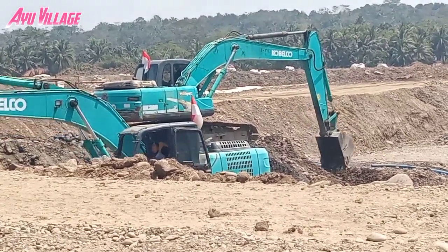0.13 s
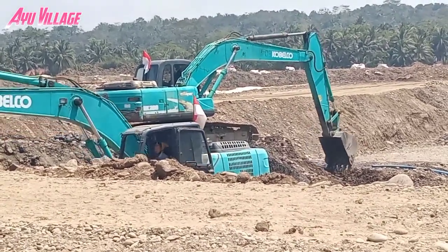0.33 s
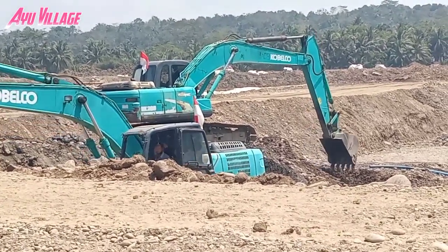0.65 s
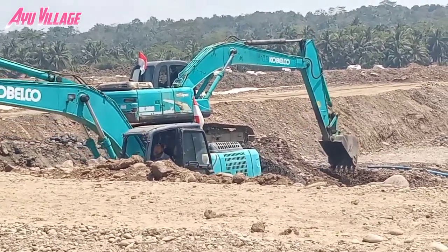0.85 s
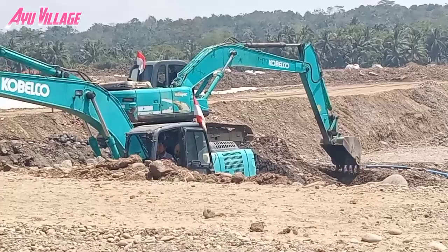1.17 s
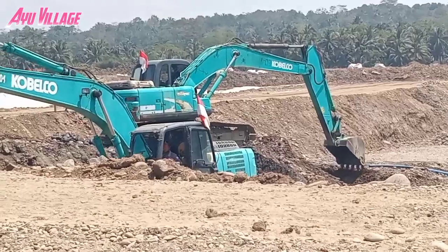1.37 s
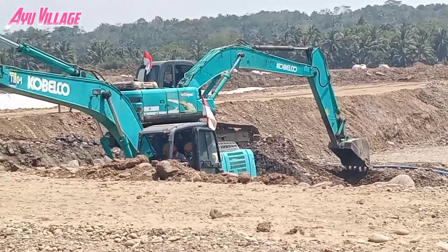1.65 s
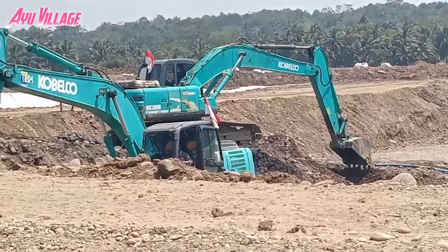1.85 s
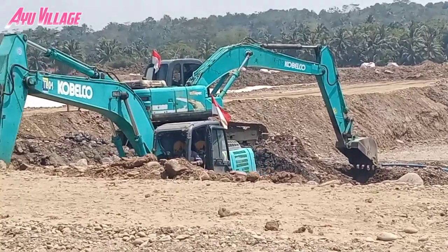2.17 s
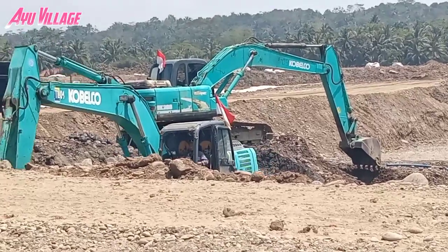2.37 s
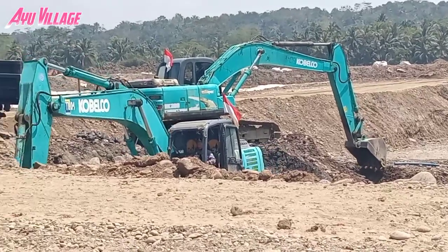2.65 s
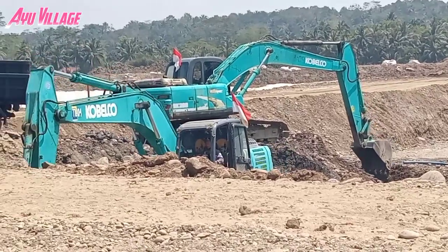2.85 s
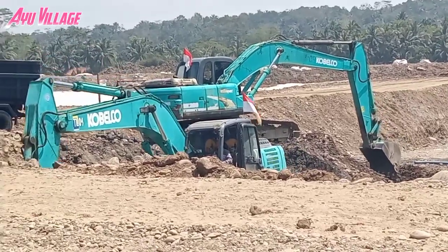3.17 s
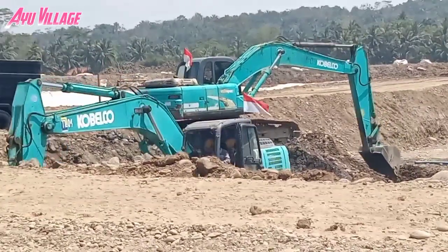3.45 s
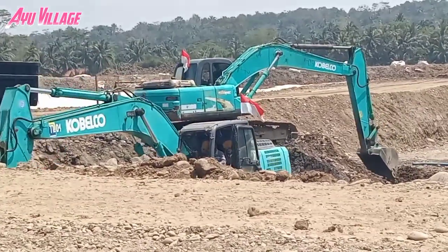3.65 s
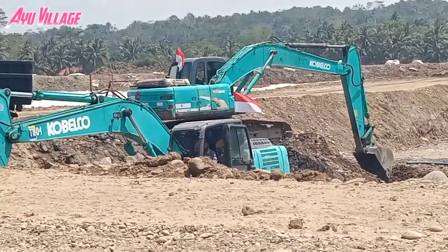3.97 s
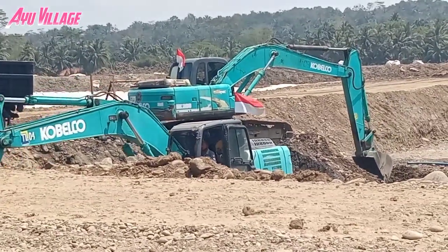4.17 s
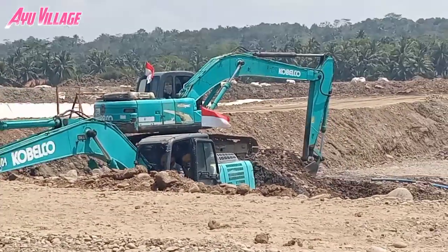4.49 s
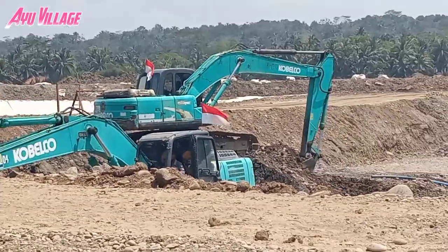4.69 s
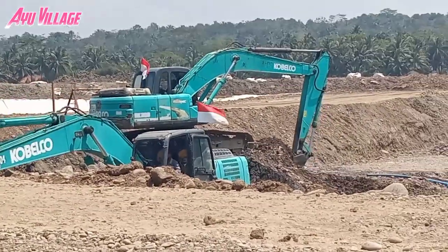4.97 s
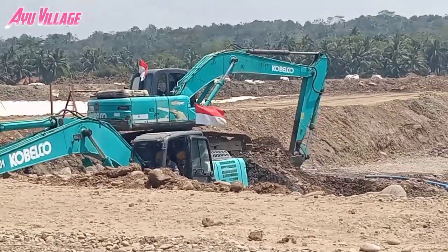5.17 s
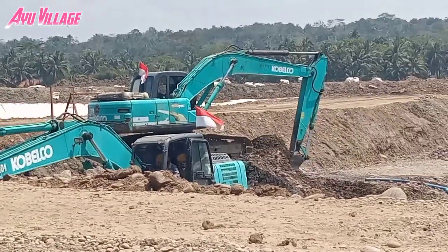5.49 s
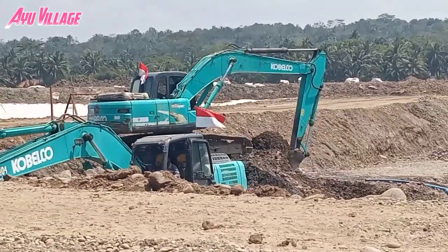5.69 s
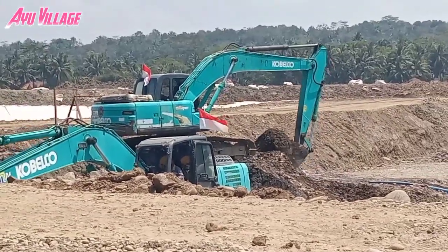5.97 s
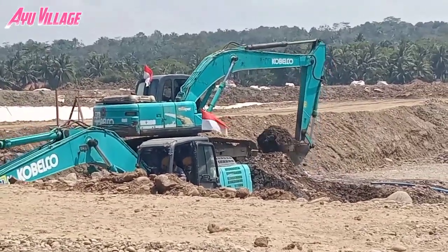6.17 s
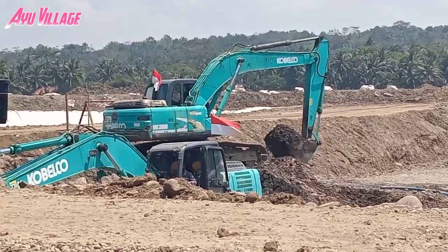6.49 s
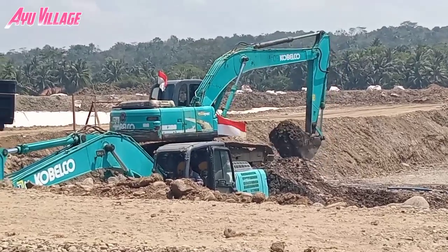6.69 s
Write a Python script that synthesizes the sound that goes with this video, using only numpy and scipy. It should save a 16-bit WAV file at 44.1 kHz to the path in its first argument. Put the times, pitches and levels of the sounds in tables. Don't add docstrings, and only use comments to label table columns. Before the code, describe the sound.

Heavy diggers work stony ground in an open pit, heard from some way off on a simple microphone with limited treble. Low exhaust throb and midrange engine roar run beneath everything. Isolated metallic clanks give way to gritty scraping, dull ground thumps and sharp stone-on-steel bangs. A very brief silent cut follows, then the engines return with a low whistle, sparse clanks and rubble.

```python
import sys
import numpy as np
from scipy import signal
from scipy.fft import rfft, irfft, next_fast_len
from scipy.io import wavfile
from scipy.ndimage import uniform_filter1d, map_coordinates

SR = 44100
rng = np.random.default_rng(int(sys.argv[2]) if len(sys.argv) > 2 else 0)


def master_out(mix):
    frames = np.transpose(np.atleast_2d(mix))
    ceiling = np.clip(frames, -1, 1)
    pcm = np.round(ceiling * 32767).astype(np.int16)
    wavfile.write(sys.argv[1], SR, pcm)


def nominal_scale(level):
    x = np.asarray(level, float) / 20
    return 10 ** x


N = 301644
CUT_S, RESUME_S = 4.3692, 4.426

# [t/s, f/Hz]
NEAR_TURBO_HZ = [
    [(0, 12000), (.5, 11600), (1, 11150), (1.2, 11100), (1.45, 11150), (1.9, 10300), (2.4, 10000),
     (2.9, 10200), (3.62, 10350), (4.3, 9700)],
    [(4.43, 11300), (4.56, 11550), (4.75, 11400), (5.1, 11300), (5.35, 10900), (5.5, 11050), (5.7, 11500),
     (6, 11300), (6.3, 11450), (6.84, 11800)],
]
# [f/Hz, width/Hz, level/dB]
BUCKET_MODES = [(399, 19, -16), (660, 51, -6.5), (856, 51, -4.5), (1292, 166, -3), (1580, 31, -9),
                (1880, 57, -11.5), (2386, 64, 4), (2665, 65, -1.5), (2880, 150, -4), (3257, 70, -4),
                (3565, 160, -8), (4020, 130, -14)]
# [f/Hz, level/dB per Hz]
CRUNCH_COLOUR = [(180, -34), (300, -5), (457, -18), (991, -11), (1330, -2), (1480, -8.5), (2080, -1),
                 (2380, 1.5), (2990, 1.5), (3900, -12), (4550, -26.5), (5920, -57.5), (10000, -120)]


def unit(x):
    return x / np.sqrt(np.mean(x ** 2) + 1e-20)


def curves(rows):
    s, *cols = np.transpose(rows)
    return [np.interp(np.arange(N) / SR, s, c) for c in cols]


def wobble(rate):
    knots = rng.standard_normal(int(N * rate / SR) + 4)
    return map_coordinates(knots, [np.arange(N) * rate / SR])


def by_view(first, second):
    return np.where(np.arange(N) < CUT_S * SR, first, second)


def filtered(x, response):
    m = next_fast_len(len(x) + 4096)
    return irfft(rfft(x, m) * response(np.fft.rfftfreq(m, 1 / SR)), m)[:len(x)]


def colour(points):
    hz, db = np.transpose(points)
    return lambda f: nominal_scale(np.interp(np.log(f + 1), np.log(hz + 1), db))


def resonant(peaks, spread_db=0, edge_hz=3900):
    gains = [(-1) ** k * nominal_scale(db + spread_db * rng.standard_normal()) for k, (_, _, db) in enumerate(peaks)]

    def response(f):
        dull = 1 / (1 - (f / edge_hz) ** 2 + 1.3j * f / edge_hz) ** 2
        modes = sum(g * 1j * f * w / (c * c - f * f + 1j * f * w) for g, (c, w, _) in zip(gains, peaks))
        return dull * modes
    return response


def split(peaks, hz):
    return [p for p in peaks if p[0] < hz], [p for p in peaks if p[0] >= hz]


def rush(response, patchy_db):
    z = signal.stft(rng.standard_normal(N), nperseg=512)[2]
    field = uniform_filter1d(rng.standard_normal(z.shape), size=5, axis=0)
    field = uniform_filter1d(field, size=12, axis=1)
    patchy = signal.istft(z * nominal_scale(patchy_db * unit(field)), nperseg=512)[1][:N]
    return unit(filtered(patchy, response))


def orders(firing, table, unsteady_db):
    turns = np.cumsum(curves(firing)[0] * (1 + 0.009 * wobble(9))) / SR
    tone = np.zeros(N)
    for multiple, db in table:
        flutter_db = unsteady_db * (wobble(13) + .2 * wobble(4))
        tone += nominal_scale(db + 1.5 + flutter_db) * np.sin(2 * np.pi * multiple * turns)
    return tone, turns


def exhaust(level_db):
    # [t/s, f/Hz]
    near_firing = [(0, 62.67), (1.5, 64.24), (2.1, 65.8), (3, 64.3), (4.3, 65.52), (4.5, 64.41), (6, 64.75),
                   (6.84, 66.3)]
    far_firing = [(0, 61.5), (1.3, 62), (2.2, 60.7), (3.5, 59.83), (4.3, 61.6), (4.7, 63.2), (5.3, 63.4),
                  (6.84, 62.3)]
    # [multiple of firing, level/dB]
    near_orders = [(2, -45), (3, -37), (4.5, -48)]
    far_orders = [(1, -43.5), (2, -49)]
    # [f/Hz, level/dB per Hz]
    pipe_colour = [(15, -62.5), (25, -48.5), (49, -20), (71, -8), (91, -14), (110, -4), (188, 2.5),
                   (208, -2.5), (221, -9.5), (288, -8.5), (335, -19.5), (399, -20), (500, -30.5),
                   (650, -46), (1100, -120)]
    near, turns = orders(near_firing, near_orders, unsteady_db=3.5)
    far, _ = orders(far_firing, far_orders, unsteady_db=2.2)
    puffs = nominal_scale(1.5 * np.sin(np.pi * turns) + 2.64 * wobble(10).clip(max=1))
    pipe = unit(filtered(puffs * rush(np.ones_like, patchy_db=-0.5), colour(pipe_colour)))
    ground_rumble = rush(colour([(15, -11), (30, 3.0), (45, -5.5), (70, -33)]), patchy_db=0.5)
    pipe += nominal_scale(-38) * ground_rumble
    tones = nominal_scale(level_db + 34) * near + nominal_scale(0.53 * (level_db + 27.5)) * far
    return tones + nominal_scale(level_db + 2.5) * unit(pipe)


def housing(swing_db):
    # [f/Hz, level/dB per Hz]
    roar_colours = [
        [(190, -42), (330, -8.5), (434, -11), (464, -2.5), (896, -10.5), (1010, -10.5), (1360, -1.5),
         (1500, -15), (1660, -2.5), (2090, -5), (2350, 2.5), (2570, -2.5), (4550, -19), (5920, -51),
         (10000, -120)],
        [(190, -53), (330, -11.5), (464, -6), (926, -11), (1230, -13), (1360, -14.5), (1660, -6), (1850, -10.5),
         (2690, -5), (3060, -12), (3310, -14), (4550, -23), (5920, -59), (10000, -120)],
    ]
    # [f/Hz, width/Hz, level/dB]
    panel_modes = [
        [(867, 51, -3.5), (1330, 180, -22), (1700, 3.5, 3.5), (2320, 90, -13.5), (2890, 120, -1),
         (4880, 79, -14.5)],
        [(1215, 85, -1.5), (1704, 48, 0.5), (2800, 91, 0.5), (5130, 61, -23), (5780, 70, -21.5)],
    ]
    level_db = by_view(-38, -38.5) + 0.97 * swing_db
    clatter = nominal_scale(0.38 * wobble(120) + 0.42 * wobble(13))
    broad = by_view(*[rush(colour(c), patchy_db=2.0) for c in roar_colours])
    panels = by_view(*[rush(resonant(p), patchy_db=1.5) for p in panel_modes])
    return nominal_scale(level_db) * unit(clatter * (broad + nominal_scale(-7.5) * panels))


def intake_hiss(swing_db):
    # [f/Hz, level/dB per Hz]
    hiss_colours = [
        [(3000, -31), (4400, 3.5), (5200, -0.5), (6200, -9), (6800, -14.5), (8200, -15.5), (9000, -13.5),
         (10000, -13.5), (11000, -19), (13600, -16.5), (14000, -24), (15500, -31)],
        [(3000, -43), (4400, 0.5), (5200, 1), (6200, -5), (7500, -10.5), (8500, -9), (8850, 0), (9300, -7),
         (10500, -17), (13500, -9.5), (15500, -22)],
    ]
    receding_db = by_view(0, 1.2 * (np.arange(N) / SR - 5.6))
    boost_khz = curves(list(NEAR_TURBO_HZ[0]) + list(NEAR_TURBO_HZ[1]))[0] / 1000 - 11
    level_db = by_view(-63, -62) + 0.58 * swing_db + 1.5 * boost_khz - receding_db
    air = nominal_scale(level_db) * by_view(*[rush(colour(c), patchy_db=1.8) for c in hiss_colours])
    top = filtered(air, lambda f: f > 10500)
    return air + top * (nominal_scale(2.5 * boost_khz.clip(max=.2)) - 1)


def whistles(tracks, fuzz):
    out = np.zeros(N)
    for rows in tracks:
        hz, db = curves(rows)
        start, end = rows[0][0], rows[-1][0]
        on = curves([(start - .01, 0), (start, 1), (end, 1), (end + .01, 0)])[0]
        level = on * nominal_scale(db + 4 * wobble(90))
        out += level * np.sin(2 * np.pi * np.cumsum(hz * (1 + fuzz * wobble(400))) / SR)
    return out


def turbo():
    # [t/s, f/Hz]
    far_turbo_hz = [
        [(1.8, 15600), (2.2, 14950), (2.6, 14850), (2.9, 15200), (3.2, 15700), (3.7, 15600), (4.1, 15250),
         (4.3, 15200)],
        [(4.8, 14800), (5.2, 14400), (5.7, 14000), (6.2, 14000), (6.84, 14600)],
    ]
    # [t/s, level/dB]
    intake_facing = [(0, -2), (.5, 0), (1.45, 1), (1.9, -5), (2.4, -1), (2.9, 0), (3.62, -5), (4.3, -6),
                     (4.43, 2), (4.6, 5), (5.1, 3), (5.35, -7), (5.5, -3), (6, -1), (6.3, 1), (6.84, -2)]
    # [t/s, f/Hz, level/dB]
    bypass = [(0, 10000, -75), (.3, 9800, -77), (.9, 9400, -84)]
    # [t/s, length/s, first f/Hz, last f/Hz, peak level/dB]
    valve_whistles = [
        (.4, .24, 5080, 4960, -64),
        (5.14, .26, 5130, 5080, -61),
        (4.43, 2.41, 1695, 1710, -47.5),
    ]
    boost_db_per_khz, coast_db_per_khz_s = 6.5, 6.5
    tracks = [np.c_[rows, np.full(len(rows), db)] for rows, db in zip(far_turbo_hz, (-80, -80.5))]
    for rows, base_db in zip(NEAR_TURBO_HZ, (-78.5, -84)):
        s, hz = np.transpose(rows)
        slowing = np.gradient(hz / 1000, s).clip(max=0)
        db = base_db + boost_db_per_khz * (hz / 1000 - 10) + coast_db_per_khz_s * slowing
        tracks.append(np.c_[s, hz, db + np.interp(s, *np.transpose(intake_facing))])
    passing = []
    for s, length, first, last, db in valve_whistles:
        middle = (s + length / 2, (first + last) / 2, db)
        passing.append([(s, first, db - 8), middle, (s + length, last, db - 8)])
    return whistles(tracks + [bypass], fuzz=.0075) + whistles(passing, fuzz=.014)


def burst(response, t60, rise, lumpy_db):
    t = np.arange(SR // 3) / SR
    contacts = np.repeat(rng.standard_normal(len(t) // 150 + 1), 150)[:len(t)]
    shape = nominal_scale(-60 * t / np.clip(t60, .01, 1)) * (1 - np.exp(-t / rise))
    blow = (rng.standard_normal(len(t)) * nominal_scale(lumpy_db * contacts) * shape)[t < t60]
    x = filtered(np.pad(blow, (SR // 100, SR // 25)), response)
    x = np.pad(x, (0, SR // 2 - len(x)))
    return .5 * x * np.linalg.norm(shape) / np.linalg.norm(x)


def add(track, s, x):
    track[round(s * SR) - SR // 100:][:len(x)] += x


def splash(t60, lumpy_db):
    # [f/Hz, level/dB per Hz]
    splinter_colour = [(3500, -9.5), (4600, 9.5), (6000, 3.5), (7000, -2.5), (8400, 3), (10000, -10),
                       (11500, -15), (13000, -13), (15500, -24)]
    # [f/Hz, width/Hz, level/dB]
    glint_modes = [(4300, 170, 24), (6300, 280, -1), (7000, 300, -1), (8300, 200, -4), (9750, 500, -2),
                   (10700, 300, -13), (12500, 500, -18.5)]
    glint = resonant(glint_modes, spread_db=3, edge_hz=13000)
    above = lambda f: glint(f) * (f / (f - 3500j)) ** 3
    splinters = burst(colour(splinter_colour), t60, .002, lumpy_db)
    return .6 * splinters + .9 * burst(above, 1.2 * t60, .002, lumpy_db)


def rings():
    # [t/s, peak level/dB, f/Hz, t60/s]
    ground_thumps = [(.074, -19, 153.6, 0.23), (.168, -17, 179, 0.22), (1.388, -14, 191, .12),
                     (2.055, -19, 200.5, .2), (2.43, -17, 188, 0.14), (2.81, -12, 192, .15),
                     (2.89, -16, 128, 0.16), (2.962, -11, 194.4, 0.17), (3.421, -18, 187, .15),
                     (3.53, -17.5, 190, 0.18), (3.54, -27.5, 394, 0.27), (4.222, -14.5, 339, 0.11),
                     (4.24, -15.5, 287, 0.11), (6.002, -18, 183.6, .15), (6.41, -29.5, 480, .15),
                     (6.47, -27, 190, 0.15), (6.595, -12, 190, 0.07), (6.705, -22, 193.6, .2)]
    # [t/s, peak level/dB, f/Hz, t60/s]
    pin_rings = [(.294, -16, 3100, 0.049), (.301, -15, 2950, 0.044), (.3, -23.5, 1950, 0.053),
                 (.314, -21, 1900, 0.041), (.306, -26, 780, .1), (.922, -22, 3000, .05),
                 (.924, -19.5, 2300, 0.07), (.927, -15.5, 1850, .07), (.925, -25, 1080, 0.13),
                 (1.521, -26, 2950, 0.089), (1.522, -18, 1880, 0.054), (1.521, -22, 1080, 0.1),
                 (1.53, -27, 2700, 0.11), (6.2, -56, 7600, 0.092), (6.185, -50.5, 8300, 0.1),
                 (6.664, -28.5, 1600, 0.13), (6.701, -52, 8300, .07), (6.701, -53, 6000, .08),
                 (4.922, -28, 2900, .06), (6.664, -28, 3000, .1), (6.69, -39, 4400, .07),
                 (6.752, -61, 8300, 0.11)]
    # [t/s, peak level/dB, f/Hz, t60/s]
    bucket_rings = [(1.996, -18, 2620, 0.066), (2.012, -21, 2350, 0.16), (2.012, -21, 1330, 0.13),
                    (2.99, -15.5, 1310, 0.067), (3.002, -13.5, 2420, .12), (3.003, -16.5, 856, 0.094),
                    (3.02, -22, 943, .06), (3.008, -14.5, 1620, 0.07), (3.031, -16, 2470, 0.068),
                    (3.066, -16, 2430, .12), (3.177, -22, 2385, 0.16), (3.18, -21, 2000, 0.066),
                    (3.482, -21, 2420, 0.045), (3.489, -6, 2550, .04), (3.497, -7, 2890, .03),
                    (3.505, -10, 2950, 0.045), (3.509, -12.5, 2230, 0.074), (3.493, -21, 1296, 0.12),
                    (3.625, -23, 3270, .06), (4.2, -24, 2454, .05), (4.222, -19, 1316, 0.08),
                    (4.222, -21, 2950, 0.052), (4.3, -25, 3200, .08), (4.349, -25, 2600, .05),
                    (4.352, -21, 3300, 0.044), (4.364, -19, 2050, .05), (6.404, -31, 1724, .08),
                    (6.44, -30, 1200, 0.075), (4.225, -19, 740, 0.065), (3.52, -26, 4010, .08),
                    (2.995, -25, 3680, .06), (3.0, -20, 700, .1), (3.055, -17, 2740, .06),
                    (3.046, -19, 3300, .05), (3.177, -20, 3200, .06), (3.178, -21, 1300, .06),
                    (3.192, -21, 2900, .08), (2.994, -48, 8090, .05), (3.068, -59, 10000, .12),
                    (4.195, -55, 9100, .06), (3.49, -13, 3200, .04), (4.1, -23, 2900, .08),
                    (1.33, -25, 2400, .08), (6.663, -26, 2300, .08), (6.695, -26, 1700, .08),
                    (6.49, -36, 2700, .08)]
    # [t/s, peak level/dB, f/Hz, t60/s]
    chinks = [(.293, -46, 10400, .04), (.295, -54, 13500, .04), (.392, -49, 8200, .04),
              (1.519, -46, 8500, .09), (1.518, -47, 7000, .04), (1.518, -51, 10200, .04),
              (1.53, -52, 6000, .08), (4.34, -50, 10000, .16), (4.341, -51, 8030, .2),
              (4.34, -58, 13000, .08), (6.701, -60, 10700, .05), (5.686, -59, 7700, .07),
              (3.493, -56, 9500, .12)]
    out, t = np.zeros(N + SR), np.arange(SR // 4) / SR
    for table, rough in [(pin_rings, 1), (bucket_rings, 1), (ground_thumps, 0), (chinks, 1)]:
        for s, db, hz, t60 in table:
            waver, drift = [map_coordinates(row, [t * 160]) for row in rough * rng.standard_normal((2, 44))]
            rise = (1 - np.exp(-t / (.0012 + 2 / hz))) ** 2
            decay_db = -60 * t / np.clip(t60, .02, .3)
            shape = nominal_scale(db + 3 - 1.5 * rough + 3 * waver + decay_db) * rise
            out[round(s * SR):][:len(t)] += shape * np.sin(2 * np.pi * hz * t + .9 * drift)
    return out[:N]


def clanks():
    # [t/s, peak level/dB, main ring f/Hz, bright level/dB, t60/s]
    pin_clanks = [
        (0.2948, -5.5, 3070, -38.5, 0.13),
        (0.9235, -6, 1934, -39.5, 0.12),
        (1.5198, -7.5, 1880, -39.5, 0.11),
        (2.477, -34, 1700, -28, 0.074),
        (3.7504, -25, 2700, -40.5, 0.12),
        (4.921, -13, 2880, -36.5, 0.13),
        (5.6839, -19, 2800, -47, 0.14),
        (6.185, -19.5, 2700, -38, 0.2),
        (6.6632, -14, 1580, -46, 0.22),
        (6.698, -17.5, 2820, -39, 0.083),
    ]
    # [f/Hz, width/Hz, level/dB]
    pin_modes = [(288, 20, 4.5), (745, 320, -17), (1090, 90, -5), (1864, 110, -8), (2260, 96, -11),
                 (2320, 69, 2), (2950, 87, -0.5), (3140, 93, -7.5), (3620, 75, -11), (3775, 110, -11.5)]
    # [t/s, peak level/dB, ring f/Hz, t60/s]
    stone_pings = [(0.387, -19, 2950, 0.084), (0.3922, -4, 2960, 0.05), (0.402, -13, 2980, 0.046),
                   (1.011, -29, 2910, 0.19), (2.254, -27.5, 1934, 0.3), (2.843, -28, 3520, 0.23),
                   (4.499, -22, 2420, 0.12), (5.672, -33, 2800, 0.088), (6.228, -28, 2880, 0.097),
                   (6.363, -22, 1720, 0.13), (6.402, -25, 1770, 0.12), (6.469, -33, 3080, 0.063)]
    out = np.zeros(N + SR)
    low, high = split(pin_modes, 1500)
    for s, db, hz, bright_db, t60 in pin_clanks:
        ring = burst(resonant(high + [(hz, 120, 1.5)], spread_db=2.5), t60, rise=0.002, lumpy_db=2.5)
        grit = burst(colour(CRUNCH_COLOUR), 1.1 * t60, rise=0.0022, lumpy_db=3.5)
        under = burst(resonant(low, spread_db=0.0), 1.7 * t60, rise=0.0032, lumpy_db=0.5)
        bright = nominal_scale(bright_db + 16.5) * splash(0.81 * t60, lumpy_db=2.5)
        add(out, s - .002, nominal_scale(db) * (0.33 * ring + 0.4 * grit + nominal_scale(-12.5) * under + bright))
    for s, db, hz, t60 in stone_pings:
        plate = resonant([(hz, 260, 0), (.64 * hz, 200, -9), (1.45 * hz, 300, -10)])
        ring = burst(lambda f: plate(f) ** 2, t60, rise=0.002, lumpy_db=0.0)
        bright = nominal_scale(-25.5 + .85 * db) * splash(0.64 * t60, lumpy_db=9)
        add(out, s - .001, nominal_scale(db) * (ring + bright))
    return out[:N]


def chips():
    # [t/s, peak level/dB, t60/s]
    stone_chips = [(2.829, -56, .03), (2.9935, -43, .025), (3.0, -42, .025), (3.005, -44, .03),
                   (3.0272, -47, .025), (3.0377, -46, .025), (3.0492, -43, .03), (3.083, -54, .02),
                   (4.3397, -45, .16), (5.32, -58, .03), (3.4925, -49, .12), (3.508, -51, .2),
                   (6.685, -56, .06), (4.19, -54, .25)]
    # [f/Hz, level/dB per Hz]
    chip_colour = [(5000, -40), (7500, -8), (9000, 0), (12500, -1), (14000, -10), (15500, -25)]
    # [t/s, peak level/dB, t60/s]
    pebbles = [(1.347, -19, .04), (1.418, -27, .06), (1.449, -27, .05), (1.59, -27, .06), (1.667, -22, .08),
               (1.7, -28, .04), (6.316, -30, .05), (6.385, -29, .07), (6.418, -28, .07), (6.448, -28, .07),
               (6.474, -29, .08), (6.596, -31, .04), (6.708, -21, .06), (3.498, -7, .03), (3.577, -17, .08)]
    out = np.zeros(N + SR)
    for s, db, t60 in stone_chips:
        add(out, s, nominal_scale(db) * burst(colour(chip_colour), t60, rise=.001, lumpy_db=2))
    for s, db, t60 in pebbles:
        plate = burst(resonant(BUCKET_MODES, spread_db=4), t60, rise=.001, lumpy_db=3)
        crunch = burst(colour(CRUNCH_COLOUR), t60, rise=.001, lumpy_db=3)
        add(out, s, nominal_scale(db) * (plate + .6 * crunch))
    return out[:N]


def grind():
    # [t/s, length/s, level/dB, heavy rumble level/dB]
    strokes = [(1.287, 0.24, -38.5, 5.5), (1.557, 0.25, -36, -0.5), (2.272, 0.1, -47, 11.5),
               (2.772, 0.2, -31.5, -15), (2.959, 0.072, -33.5, 17.5), (3.042, 0.19, -25.5, -2.5),
               (3.493, 0.26, -39.5, 3), (4.154, 0.095, -30.5, -4), (4.218, 0.024, -34.5, 15),
               (4.298, 0.053, -39, 7), (6.375, 0.13, -35, 5), (6.673, 0.025, -33.5, -10)]
    bite_s, release_db_per_s = 0.044, 161.5
    out, t = np.zeros(N), np.arange(N) / SR
    grains = rng.standard_normal(N) * nominal_scale(2.5 * wobble(300) + 3.5 * wobble(35))
    plates = unit(filtered(grains, resonant(BUCKET_MODES)))
    stones = unit(plates + 0.64 * unit(filtered(grains, colour(CRUNCH_COLOUR))))
    heavy_modes = [(324, 100, -1.0), (480, 190, -2.0), (765, 910, -2.5)]  # Hz, width Hz, dB
    heavy = unit(filtered(grains, resonant(heavy_modes, edge_hz=1050)))
    for s, length, db, heavy_db in strokes:
        bite = ((t - s) / bite_s + .5).clip(0, 1)
        release = nominal_scale(-release_db_per_s * (t - s - length).clip(0))
        out += nominal_scale(db - 4.0) * bite * release * (stones + nominal_scale(heavy_db - 5.5) * heavy)
    return out


def bangs():
    # [t/s, peak level/dB, weight/dB, bright level/dB, t60/s]
    rock_bangs = [(1.3281, -19.5, -10, -55.5, 0.12), (1.4101, -23, 1.5, -43, 0.075),
                  (1.9955, -12.5, -10, -48.5, .23), (2.012, -16.5, -9, -48, 0.29),
                  (2.344, -24, -6, -42, 0.26), (2.8884, -29, -16, -57, .2), (2.9625, -14, 4, -63.5, 0.22),
                  (2.99, -3, -22, -46, 0.21), (3.006, -5, -16, -51, 0.19), (3.0297, -15.5, -16, -38, 0.23),
                  (3.0651, -6.5, -22, -48, 0.17), (3.089, -25.5, -6, -39, 0.23),
                  (3.1764, -9, -14.5, -48.5, 0.12), (3.4905, 0, -44, -52, 0.19),
                  (3.5051, -5, -15, -53, 0.31), (3.5305, -12, -15.5, -55, 0.42),
                  (3.6199, -13, -23, -59, 0.16), (4.099, -20.5, -4.5, -45, 0.29),
                  (4.1884, -18, -6.5, -35.5, 0.46), (4.2243, -14, 3.5, -51, 0.12),
                  (4.2998, -17, -16, -39.5, 0.24), (4.3488, -6, -11, -45, 0.089),
                  (4.3623, -9, -16, -51, 0.08)]
    # [t/s, peak level/dB, weight/dB]
    settling = [
        (6.4036, -28.5, 4),
        (6.431, -29, -11),
        (6.4647, -32.5, 4),
        (6.501, -43, 0),
    ]
    # [f/Hz, width/Hz, level/dB]
    shell_modes = [(123.4, 23, 1.5), (215.5, 27, 2.5), (304, 20, -6), (348, 51, -13.5), (400.5, 18, -4),
                   (486, 22, -9)]
    out = np.zeros(N + SR)
    low, high = split(BUCKET_MODES, 1500)
    rubble = [(*row, -60, 0.15) for row in settling]
    for s, db, weight_db, bright_db, t60 in list(rock_bangs) + rubble:
        plate = burst(resonant(high, spread_db=-3), t60, rise=0.0015, lumpy_db=-3.2)
        crunch = burst(colour(CRUNCH_COLOUR), 1.17 * t60, rise=0.002, lumpy_db=2.0)
        wall = burst(resonant(low, spread_db=3.5), 1.5 * t60, rise=0.0023, lumpy_db=-2.0)
        boom = burst(resonant(shell_modes, spread_db=2.5), 1.6 * t60, rise=0.002, lumpy_db=2)
        splinter = splash(.75 * t60, lumpy_db=4.5)
        body = 0.38 * plate + 0.56 * crunch
        body += nominal_scale(-4.5 + 0.7 * weight_db) * wall + nominal_scale(weight_db) * boom
        add(out, s - .001, nominal_scale(db) * (body + nominal_scale(bright_db + 8.0) * splinter))
    return out[:N]


def scene():
    # [t/s, exhaust level/dB]
    effort = [
        [(0.0, -34.5), (1.46, -33), (1.76, -35), (2.84, -34.5), (3.05, -29), (3.21, -32.5), (4.22, -34.5),
         (4.3, -32)],
        [(4.8, -33.5), (5.49, -36.5), (6.39, -34), (6.6, -35.5), (6.71, -33), (6.84, -35.5)],
    ]
    effort_db, = curves(list(effort[0]) + list(effort[1]))
    swing_db = effort_db - effort_db.mean()
    engines = exhaust(effort_db) + housing(swing_db) + intake_hiss(swing_db) + turbo()
    digging = rings() + clanks() + chips() + grind() + bangs()
    return (engines + digging)[None]


def roll_off(x):
    return signal.sosfilt(signal.butter(12, 15525, fs=SR, output="sos"), x)


def record(dry):
    t = np.arange(N) / SR
    residue = nominal_scale(-28 - 2600 * (t - CUT_S).clip(0))
    fade = 1 - (1 - nominal_scale(-29)) * np.exp(-(t - RESUME_S).clip(0) / .15)
    gain = np.where(t < CUT_S, 1, np.where(t < RESUME_S, residue, fade))
    mix = filtered(dry[0] * gain, lambda f: f < 15550)[None]
    return roll_off(mix)


dry = scene()
out = record(dry)
master_out(out)
```